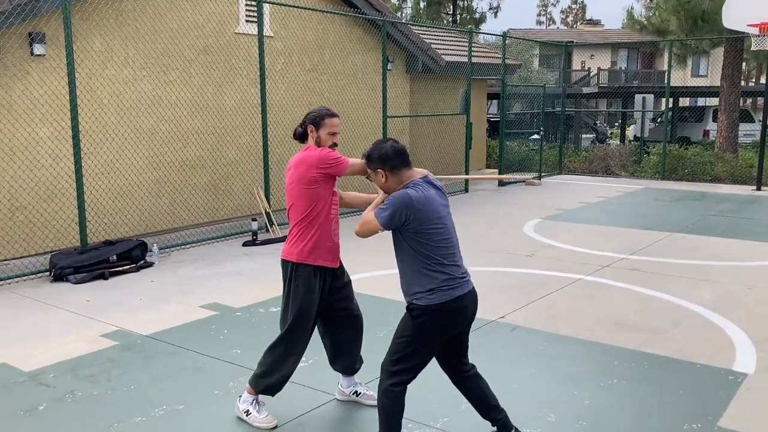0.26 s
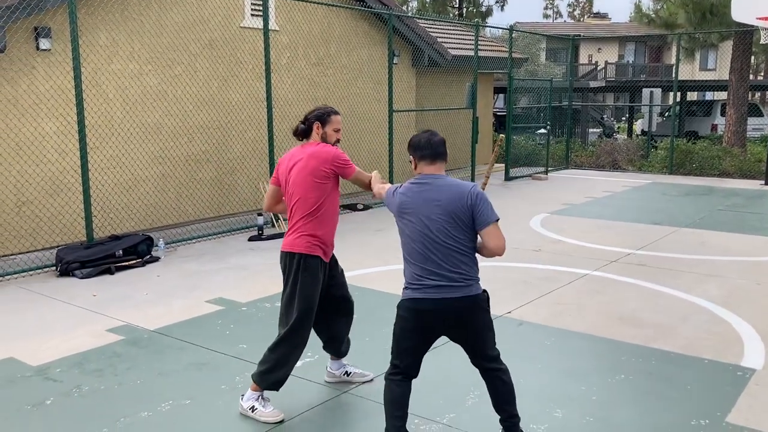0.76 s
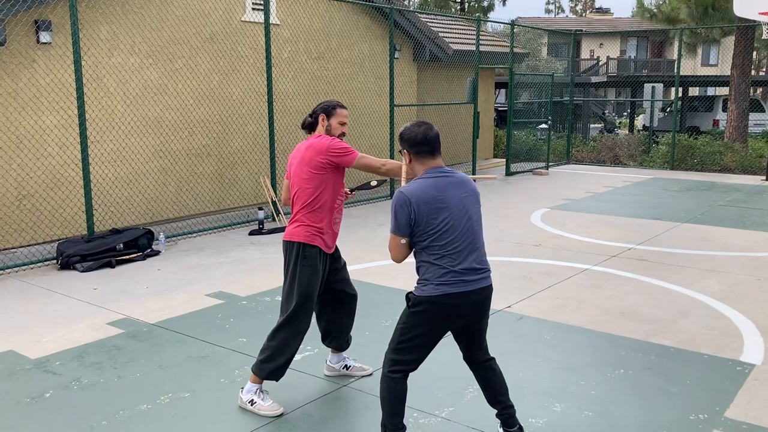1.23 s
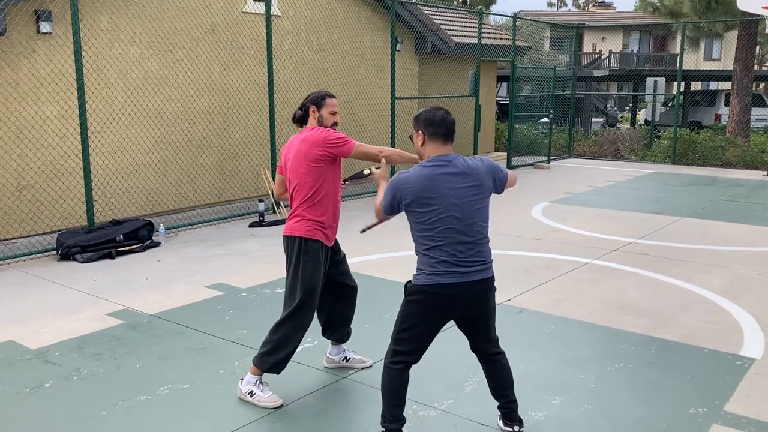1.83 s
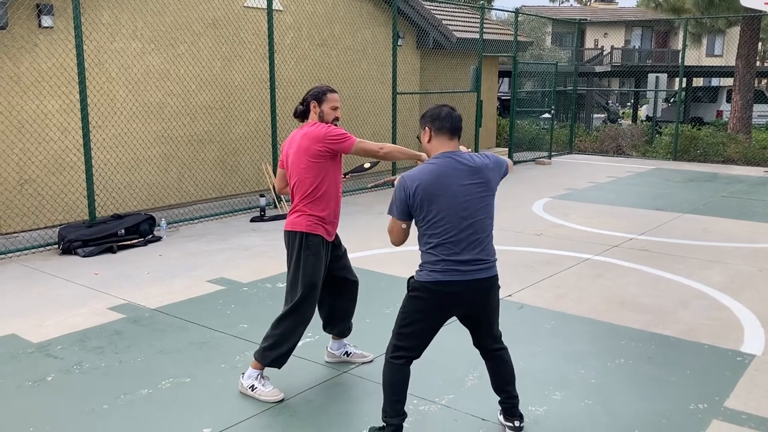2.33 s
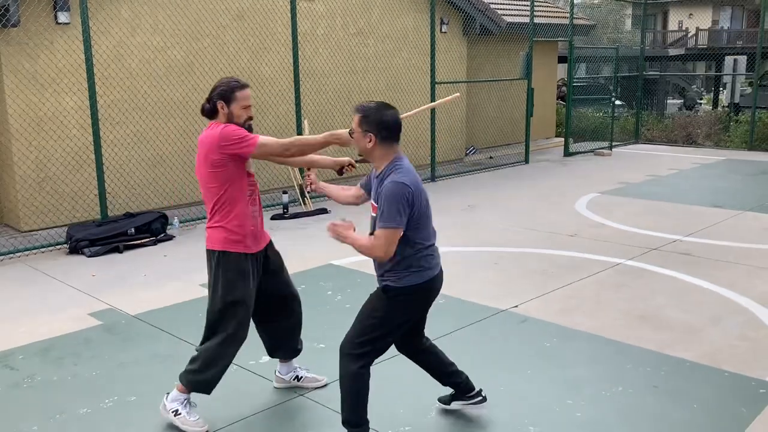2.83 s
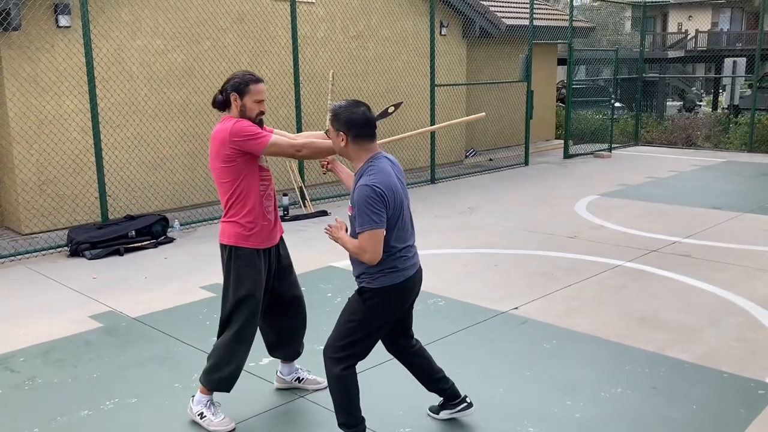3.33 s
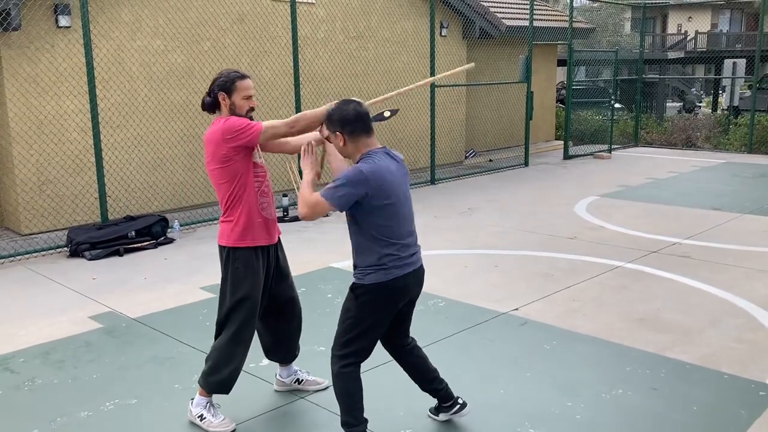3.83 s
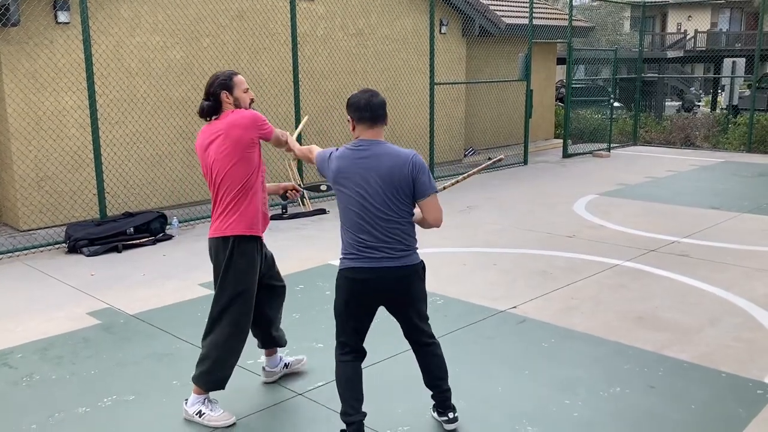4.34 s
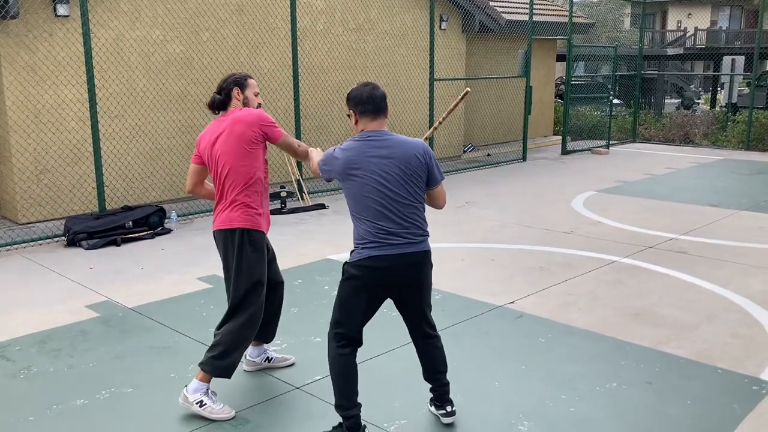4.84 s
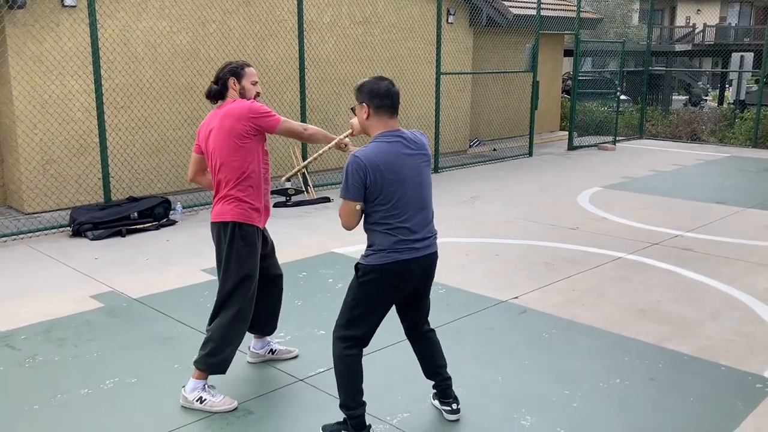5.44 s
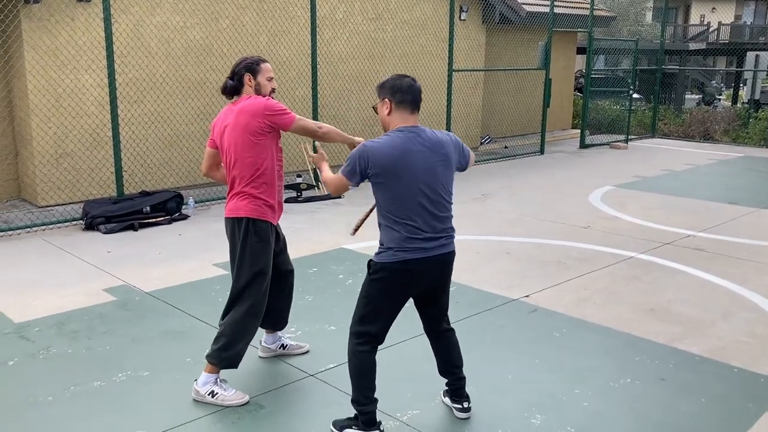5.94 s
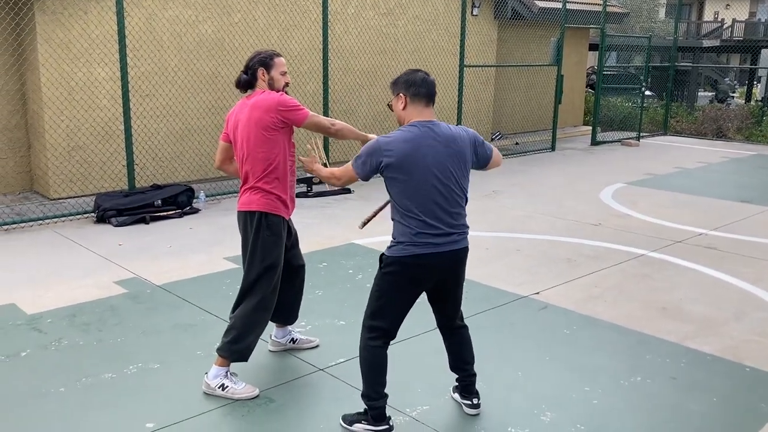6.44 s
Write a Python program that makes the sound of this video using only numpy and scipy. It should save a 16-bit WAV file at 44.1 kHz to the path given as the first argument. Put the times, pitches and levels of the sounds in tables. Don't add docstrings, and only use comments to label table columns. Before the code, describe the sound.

Outdoors on a concrete court, an old stick clack rings away over a low engine drone and distant traffic. Soles scrape grit, hands and wood tap lightly, and weight thuds down. After a brief dip the engine vanishes, a car draws away, and one loud wooden crack sounds close to the phone, echoing off a wall. Scuffs, taps and small bird whistles follow.

```python
import sys
import numpy as np
from scipy import signal
from scipy.fft import rfft, irfft, next_fast_len
from scipy.io import wavfile
from scipy.ndimage import uniform_filter1d, map_coordinates

SR = 44100
rng = np.random.default_rng(int(sys.argv[2]) if len(sys.argv) > 2 else 0)


def store_pcm(level_fs):
    pcm = np.round(np.clip(level_fs, -1, 1) * 32767).astype(np.int16)
    wavfile.write(sys.argv[1], SR, np.atleast_2d(pcm).T)


def to_linear_factor(level_db):
    exponent = np.asarray(level_db, float) / 20
    return 10 ** exponent


N = 294588
TIME = np.arange(N) / SR
CHANGE_S = 2.615


def unit(x):
    return x / np.sqrt(np.mean(x ** 2) + 1e-20)


def along(points, hz):
    f, v = np.transpose(points)
    return np.interp(np.log(hz + 1), np.log(f + 1), v)


def curves(rows):
    s, *cols = np.transpose(rows)
    return [np.interp(TIME, s, c) for c in cols]


def wobble(rate):
    return map_coordinates(rng.standard_normal(int(N * rate / SR) + 4), [np.arange(N) * rate / SR])


def filtered(x, response):
    m = next_fast_len(x.shape[-1] + 8192)
    return irfft(rfft(x, m) * response(np.fft.rfftfreq(m, 1 / SR)), m)[..., :x.shape[-1]]


def narrow(hz, width, samples):
    noise = rng.standard_normal((2, samples))
    return unit(filtered(noise, lambda f: np.exp(-2 * ((f - hz) / width) ** 2)))


# frequency in Hz, left-right likeness.
LIKENESS = [(60, 0.96), (130, 0.95), (290, 0.72), (640, 0.13), (1410, -0.04), (3100, 0.014), (6820, 0.079),
            (15000, 0.63)]


def rush(spectrum, patchy_db):
    z = signal.stft(rng.standard_normal((2, N)), nperseg=512)[2]
    field = uniform_filter1d(rng.standard_normal(z.shape[1:]), 6, 0)
    field = uniform_filter1d(field, 12, 1)
    pair = signal.istft(z * to_linear_factor(patchy_db * unit(field)), nperseg=512)[1][:, :N]

    def mid_and_side(hz):
        angle = np.arccos(np.clip(along(LIKENESS, hz), -1, 1)) / 2
        return to_linear_factor(along(spectrum, hz)) * [np.cos(angle), np.sin(angle)]

    mid, side = filtered(pair, mid_and_side)
    return unit(np.array([mid + side, mid - side]))


def blank():
    return np.zeros((2, N + SR))


def add(track, s, sound):
    track[:, round(s * SR):][:, :sound.shape[-1]] += sound


def sides(pan_db):
    return to_linear_factor([[pan_db / 2], [-pan_db / 2]])


def ring(t, hz, t60, attack, lag=0):
    return to_linear_factor(-60 * t / t60) * (1 - np.exp(-t / attack)) * np.sin(2 * np.pi * hz * t - lag)


# frequency in Hz, width in Hz, level in dB, 60 dB decay in seconds.
OLD_CLACK = [
    (1790, 480, -60, 0.98),
    (2740, 160, -57.5, 0.38),
    (3660, 180, -69.5, 0.62),
    (6800, 980, -74.5, 0.82),
]


def earlier_clack():
    n = SR // 2
    tail = 0
    for hz, width, db, t60 in OLD_CLACK:
        tail = tail + to_linear_factor(db + 2.5 * wobble(31)[:n]) * narrow(hz, width, n) * to_linear_factor(-60 * TIME[:n] / t60)
    return np.pad(tail, ((0, 0), (0, N - n)))


# time in seconds, firing rate in Hz, level in dB, beating neighbour in dB relative to it.
ENGINE_RUN = [(0, 76.6, -40, 2), (.13, 87.74, -51.5, -29), (.23, 90.2, -33, -9), (.4, 89.7, -48, -15),
              (.55, 90.5, -42, -17), (.68, 89.9, -46, -26), (.9, 89, -46.5, -14), (1, 89.35, -40, -24),
              (1.5, 88.63, -40.5, -23), (1.65, 84.97, -36, -30.5), (1.98, 74.5, -35.5, -37),
              (2.1, 71.9, -39.5, -0.5), (2.3, 69.25, -46.5, 1.5), (2.43, 71.9, -44.5, 1),
              (2.6, 77.44, -30, -11.5)]
# frequency in Hz, density in dB per Hz.
EXHAUST = [(40, -40.5), (60, 0), (75, 3), (110, -1), (140, -12.5), (250, -57)]
EXHAUST_DB = -47
BEAT_HZ, BEAT_NULL_S = 8.4, 2.212


def engine():
    hz, db, near_db = curves(ENGINE_RUN)
    phase = 2 * np.pi * np.cumsum(hz) / SR + .25 * wobble(10)
    beat = 2 * np.pi * BEAT_HZ * (TIME - BEAT_NULL_S)
    rough = to_linear_factor(1.6 * wobble(14))
    second_order = to_linear_factor(-22.5) * np.sin(2 * phase)
    neighbour = to_linear_factor(near_db) * np.sin(phase - beat)
    tone = np.sqrt(2) * rough * (np.sin(phase) + second_order - neighbour)
    exhaust = to_linear_factor(EXHAUST_DB) * rush(EXHAUST, patchy_db=3.5)
    return (to_linear_factor(db + 0.22) * tone + exhaust) * (TIME < CHANGE_S) * sides(-1.2)


# time in seconds, tyre wash in dB.
ROAD_STRENGTH = [
    (0, -64),
    (.8, -64),
    (1.6, -66.5),
    (2.2, -64),
    (2.6, -64),
    (2.7, -53),
    (3.3, -57.5),
    (4.7, -60.5),
    (5.7, -59.5),
    (6.68, -59.5),
]
# frequency in Hz, density in dB per Hz.
ROAD_RUMBLE = [(22, -41), (33, -13), (45, 0.5), (90, 2), (130, -3), (190, -6.5), (260, -18.5), (500, -49),
               (2000, -98)]
ROAD_DRONE = [(120, -40.5), (200, -1.5), (250, -1), (330, -7), (450, -11.5), (700, -29), (2000, -94)]
TYRE_WASH = [(150, -32.5), (400, -2.5), (800, 0), (1300, -7.5), (2000, -11), (3000, -22.5), (5000, -31.5),
             (9000, -41), (16000, -47.5)]
# frequency in Hz, gain in dB.
SCREEN = [(300, 3), (600, 0.5), (1500, -1.5), (2200, -2.5), (4000, -2.5), (6000, -1)]
ROAD_DB, RUMBLE_DB, DRONE_DB = -62.5, -52.5, -58
RUMBLE_FOLLOWS, DRONE_FOLLOWS = 0.49, 0.81


def traffic():
    wash_db, = curves(ROAD_STRENGTH)
    swing_db = wash_db - ROAD_DB
    rumble_db = RUMBLE_DB + RUMBLE_FOLLOWS * swing_db + 5.5 + 0.88 * wobble(4.9)
    rumble = to_linear_factor(rumble_db) * rush(ROAD_RUMBLE, patchy_db=0.8)
    drone_db = DRONE_DB + DRONE_FOLLOWS * swing_db + 1.0 + 0.83 * wobble(8.9)
    drone = to_linear_factor(drone_db) * rush(ROAD_DRONE, patchy_db=2.0)
    wash = rush(TYRE_WASH, patchy_db=1.74)
    screened = filtered(wash, lambda hz: to_linear_factor(along(SCREEN, hz)))
    wash_gain = to_linear_factor(wash_db + 2.0 + 0.37 * wobble(5.3))
    return rumble + drone + wash_gain * np.where(TIME < CHANGE_S, screened, wash)


# frequency in Hz, density in dB per Hz.
SOLE_HISS = [(1500, -31), (4000, -7.5), (6000, -2), (8000, -2.5), (11500, -0.5), (16000, -5.5)]
GRIT_NOISE = [(500, -16), (1200, -0.5), (2800, -3), (4000, -2), (5000, -9.5), (8000, -41.5)]
# start in seconds, held time in seconds, hiss in dB, grit over hiss in dB,
# fade while held in dB.
SHOE_DRAGS = [(0, 0.17, -86.5, 27.5, 8.5), (.26, 0.13, -64.5, 6, 5.5), (.55, 0.05, -72.5, 1, -11),
              (.62, 0.094, -60.5, -4, 12), (0.777, 0.068, -62.5, 2, 3.5), (1.225, 0.04, -80.5, 10, -2),
              (1.535, .04, -77.5, 10, 6), (2.635, 0.14, -61.5, 2.5, -10), (2.84, 0.061, -58, 13.5, 5),
              (2.955, 0.064, -53.5, -11, -0.5), (3.1, 0.17, -83.5, 23.5, 10),
              (3.402, 0.41, -89, 14.5, -6.5), (3.755, 0.024, -71, 8, 2.5), (3.8, 0.14, -75, 9.5, 3.5),
              (3.95, 0.11, -65, 3.5, 1.5), (4.08, 0.083, -65.5, -8, 0), (4.25, .12, -66.5, 3.5, 1),
              (4.448, 0.058, -56.5, 5.5, 1.5), (4.55, 0.026, -65.5, 8, 8), (4.6, 0.23, -81.5, 14.5, 7.5),
              (5.235, 0.083, -71, 15, 14.5), (5.565, 0.031, -68, 9, 7.5), (6.28, 0.14, -86.5, 4.5, -2)]
DRAG_RISE_DB_PER_S, DRAG_FALL_DB_PER_S = 749, 299
RUSTLE_DB, RUSTLE_GROWS_DB = -90, 7.5


def shoes():
    hiss_gain = grit_gain = to_linear_factor(RUSTLE_DB + RUSTLE_GROWS_DB * (TIME > CHANGE_S))
    for s, held, db, grit_db, fade_db in SHOE_DRAGS:
        rise = DRAG_RISE_DB_PER_S * np.maximum(s - TIME, 0)
        fade = fade_db * np.clip((TIME - s) / held, 0, 1)
        fall = DRAG_FALL_DB_PER_S * np.maximum(TIME - s - held, 0)
        drag = to_linear_factor(db - rise - fade - fall)
        hiss_gain = np.hypot(hiss_gain, drag)
        grit_gain = np.hypot(grit_gain, to_linear_factor(grit_db) * drag)
    grains = to_linear_factor(2.59 * wobble(320) + 1.5 * wobble(40))
    hiss = to_linear_factor(5.0) * hiss_gain * unit(grains * rush(SOLE_HISS, patchy_db=2.5))
    grit = to_linear_factor(-2.5) * grit_gain * unit(grains * rush(GRIT_NOISE, patchy_db=-1.0))
    return hiss + grit


# start in seconds, length in seconds, frequency in Hz, width in Hz, level in dB.
RUBS = [(0.25, 0.043, 4050, 360, -64), (0.26, .045, 3700, 500, -62.5), (0.25, .025, 4400, 500, -66),
        (0.198, 0.054, 3900, 300, -74), (.035, 0.075, 1820, 260, -61), (.1, 0.047, 1580, 150, -64),
        (2.96, 0.15, 2600, 3800, -68), (1.242, 0.16, 4400, 300, -82), (4.449, 0.052, 4200, 1000, -52),
        (4.1, 0.12, 4400, 700, -71.5), (5.492, 0.13, 4050, 496, -72), (5.602, 0.1, 4200, 600, -73),
        (6.31, 0.16, 3960, 601, -77)]


def swishes():
    out = blank()
    for s, length, hz, width, db in RUBS:
        u = np.linspace(0, 1, int(length * SR))
        add(out, s, to_linear_factor(db) * np.sin(np.pi * u ** 0.8) * narrow(hz, width, SR // 4)[:, :len(u)])
    return out[:, :N]


# start
# in seconds, peak in dB, ring in Hz, left over right in dB.
TAP_RINGS = [(0.7698, -41.5, 613, 3), (.796, -40, 880, 4), (0.802, -37.5, 1070, 1), (0.797, -46.5, 3700, 3),
             (0.8034, -41, 1880, 5), (1.2315, -56, 1790, -4.5), (1.31, -62.5, 3900, -3),
             (1.528, -57, 3892, 4), (2.214, -55.5, 2392, -0.5), (2.703, -37, 512, 2),
             (2.795, -33.5, 2390, -8.5), (2.8605, -39.5, 1180, 1), (2.95, -24, 3700, 0),
             (2.9503, -33, 783, 3), (2.9504, -36, 1670, 6), (4.4415, -30, 744, 3), (4.4416, -36, 3580, 1.5),
             (4.472, -41, 1510, -1.5), (4.4705, -27, 3830, -0.5), (4.47, -35.5, 560, 0),
             (4.479, -35, 3920, 0), (4.5, -33, 5400, -12), (4.5503, -50, 3500, 0), (5.159, -59, 1394, 1.5),
             (5.214, -51.5, 1660, -1), (5.211, -50, 3670, 0.5), (5.29, -53, 3500, -2.5),
             (5.5555, -45.5, 3960, 1), (5.586, -57, 2298, 5), (5.665, -58, 3457, -1.5),
             (.5435, -57, 430, 5), (0.7956, -41, 1450, 3), (.7968, -46, 2350, 11), (0.802, -46, 1390, 2),
             (0.7687, -52, 1300, 5), (0.7694, -56, 3905, 5), (0.827, -50, 4700, 2), (.8285, -50, 3970, 0),
             (1.0475, -54, 580, 5), (2.626, -48, 1550, -5.5), (2.753, -46.5, 986, 4.5),
             (2.664, -38.5, 4460, 0), (2.688, -44.5, 4700, 3), (2.9758, -44, 1040, .5),
             (4.44, -40, 6550, 0), (4.4555, -40, 3700, 1.5), (4.463, -41, 4470, -3.5),
             (4.472, -36, 6340, 5), (4.4765, -31, 5000, 0), (4.5012, -48, 4160, -5),
             (0.517, -55.5, 2000, -6), (.592, -50, 1200, 0), (.592, -42, 4500, 2),
               (.668, -59, 2150, -3.5), (1.2311, -65, 2280, 3), (1.2317, -54.5, 3270, 8),
               (1.3, -47, 6500, -1), (1.309, -60, 6200, 2.5), (1.34, -67, 6200, 1), (1.529, -63, 2270, 2),
               (2.9, -62, 1630, -1), (2.215, -66.5, 4600, 0), (3.579, -49, 1630, -0.5),
               (3.577, -59, 2900, -0.5), (3.827, -52, 3000, 0.5), (5.2105, -51, 3200, 2),
               (5.212, -52, 6720, -0.5), (5.554, -57, 2060, 2), (5.554, -49, 7590, -1.5),
               (5.615, -58, 4700, 0), (2.703, -49, 1300, 0), (4.4405, -50, 1700, 7),
               (4.4408, -54, 2400, -4), (4.4704, -52.5, 2500, 3.5), (4.475, -45, 1300, 0),
               (2.6545, -33, 9200, 2.5), (.5917, -42, 10650, 0), (.592, -47, 530, 2),
               (.7965, -38.5, 560, 7), (.779, -51, 1200, 2), (2.657, -43.5, 460, -0.5),
               (2.8225, -37, 520, 0), (2.826, -40.5, 850, 1), (4.4985, -41, 580, 4), (4.447, -44, 670, 1),
               (4.4885, -49, 1700, 0), (4.578, -49, 4700, 0), (2.8645, -42, 750, 0), (5.242, -58, 4300, 0),
               (2.9502, -34, 2880, 1), (2.9498, -35, 4400, 0), (2.951, -37.5, 1170, 3),
               (.625, -55, 4400, 0), (.6245, -55, 3800, 0), (.624, -58, 2350, 0), (5.214, -46, 4000, 1),
               (5.552, -52, 2980, 0), (4.4755, -44, 1800, 0), (4.4985, -50, 1730, 0)]
GRIP_S, TAP_CYCLES = 0.0043, 7.4


def taps():
    out, t = blank(), np.arange(SR // 10) / SR
    for s, db, hz, pan_db in TAP_RINGS:
        lag = np.array([[-1], [1]]) * hz / 4500
        t60 = GRIP_S + TAP_CYCLES / hz
        sound = ring(t, hz, t60, 0.00038, lag)
        sound = sound + 0.19 * ring(t, 0.67 * hz, t60, 0.00046, lag)
        sound = sound + 0.17 * ring(t, 1.1 * hz, 0.29 * t60, 0.000068, lag)
        add(out, s, to_linear_factor(db + 6.5) * sound * sides(pan_db))
    return out[:, :N]


# start in seconds, peak in dB, dull part in dB, length in seconds,
# left over right in dB.
FLAT_SLAPS = [(0.624, -59, 6, 0.0037, 2), (0.8, -60, 8, 0.0089, -4), (1.262, -66, 0, 0.0044, 0),
              (0.592, -38.5, -7.5, 0.0085, 1), (0.768, -54, -9, 0.0025, 3), (0.825, -55.5, 2, 0.004, -2),
              (1.232, -51, 0.5, 0.006, 0.5), (1.528, -52.5, -5, 0.0064, 2), (2.217, -51.5, -7.5, 0.0045, 0),
              (2.6545, -22, -14.5, 0.0022, 2), (2.658, -24.5, -11.5, 0.0079, -2),
              (2.8581, -36, -6, 0.0056, -0.5), (2.95, -40, 3, 0.0027, 1), (3.579, -70, 9.5, 0.0031, -3.5),
              (3.824, -66.5, 10, 0.0043, 0.5), (4.245, -64, -6, .004, 0), (2.847, -48, -6, .003, 1),
              (4.4405, -37, -14.5, .003, -1.5), (4.463, -37, -17, 0.0026, -8),
              (4.4702, -35.5, -1, 0.0047, 4.5), (5.212, -44.5, -3, 0.0076, 0),
              (5.553, -43, -5.5, 0.0086, 1), (5.58, -57.5, -2, 0.016, 0), (6.235, -59, -10, 0.0034, -0.5)]


def slaps():
    out, t = blank(), np.arange(SR // 20) / SR
    for s, db, dull_db, length, pan_db in FLAT_SLAPS:
        noise = rng.standard_normal((2, 3, len(t)))
        shared = noise[:, :1]
        air = 1.4 * noise[:, 1:] + shared - .9 * signal.hilbert(shared).imag * [[1], [-1]]
        knots = t[::60]
        spurts = to_linear_factor(2.4 * np.interp(t, knots, rng.standard_normal(len(knots))))
        shape = spurts * np.exp(-(t / length) ** 3) + 1.8 * np.exp(-t / 0.00054) + 0.049 * np.exp(-t / .015)
        lumps_db = rng.normal(0, 1.0, size=24)
        cup = lambda hz: to_linear_factor(np.interp(hz, np.linspace(0, 16000, len(lumps_db)), lumps_db))
        bright = unit(filtered(air[0], lambda hz: cup(hz) * to_linear_factor(along(SOLE_HISS, hz)) * (hz / 9000) ** 0.28))
        dull = unit(filtered(air[1], lambda hz: cup(hz) * to_linear_factor(along(GRIT_NOISE, hz))))
        add(out, s, to_linear_factor(db - 7.0) * shape * (bright + to_linear_factor(dull_db) * dull) * sides(pan_db))
    return out[:, :N]


# start in seconds, peak in dB, frequency in Hz, 60 dB decay in seconds.
HEAVY_THUDS = [(.811, -20, 223, 0.063), (.823, -17, 98, 0.093), (0.8368, -24, 175, 0.065),
               (2.7036, -25, 300, 0.027), (2.756, -28, 290, 0.042), (2.815, -23.5, 255, 0.064),
               (4.472, -31, 300, .06), (4.45, -35, 270, .05), (0.846, -27.5, 58.7, 0.31),
               (.862, -19.5, 90, 0.047), (2.79, -10.5, 280, 0.033), (2.806, -24, 101.5, 0.2),
               (2.83, -22.5, 61, 0.2), (2.9519, -29, 330, 0.03), (4.495, -21.5, 91, 0.056),
               (4.508, -29.5, 46, 0.44), (4.89, -26.5, 64.5, 0.2)]


def thuds():
    out, t = blank(), np.arange(SR // 2) / SR
    for s, db, hz, t60 in HEAVY_THUDS:
        add(out, s, to_linear_factor(db - 4.0) * ring(t, hz, t60, 0.29 / hz)[None])
    return out[:, :N]


# start in seconds, length in seconds, first pitch in Hz, last pitch in Hz, level in dB.
WHISTLES = [(1.076, 0.059, 4300, 4310, -73), (1.14, 0.085, 4300, 4350, -86), (1.698, .07, 4220, 4210, -85),
            (1.527, 0.022, 10000, 9700, -79), (1.645, 0.02, 10030, 9900, -76),
            (1.634, 0.054, 4180, 4250, -79.5), (1.761, 0.018, 10040, 9820, -76),
            (1.788, 0.032, 4080, 3675, -79), (1.845, 0.03, 4030, 3408, -78), (1.89, 0.022, 9950, 9800, -75),
            (1.995, 0.023, 9800, 9800, -82), (2.108, .018, 9800, 9700, -79),
            (2.421, 0.076, 4170, 4180, -80), (3.469, 0.053, 4410, 4400, -61),
            (4.82, 0.057, 4300, 4390, -74.5), (4.965, 0.015, 3500, 3250, -73),
            (5.003, 0.011, 3400, 3250, -76), (5.017, 0.013, 3470, 3300, -75.5),
            (6.07, 0.052, 4330, 4400, -73), (3.55, 0.016, 4390, 4400, -70)]
CLEAR_DB, BLURS_DB = -66, 9


def birds():
    out = blank()
    for s, length, from_hz, to_hz, db in WHISTLES:
        u = np.linspace(0, 1, int(length * SR))
        phase = 2 * np.pi * np.cumsum(from_hz + (to_hz - from_hz) * u) / SR
        phase = phase + .4 * np.sin(75 * 2 * np.pi * u * length)
        phase = phase + np.clip((CLEAR_DB - db) / BLURS_DB, 0, 3) * wobble(120)[:len(u)]
        swell = np.sin(np.pi * u) ** 0.61
        flutter = to_linear_factor(2.5 * np.sin(38 * 2 * np.pi * u * length + rng.uniform(0, 6)))
        add(out, s, to_linear_factor(db + 1.0) * swell * flutter * np.sin(phase + np.array([[0], [1.3]])))
    return out[:, :N]


# delay in ms, frequency in Hz,
# width in ms, left level in dB, right level in dB.
CRACK_PATHS = [(0, 2800, .2, 1, -30), (.5, 3570, .65, -19, -11), (1.91, 2450, .5, -19, -7),
               (1.4, 1670, 1.1, -16, -19), (-.25, 7000, .2, -21, -24), (-.25, 11500, .15, -19, -21),
               (1.4, 4200, 1, -23, -17.5), (3.4, 3300, .6, -32, -29), (1.5, 7000, .6, -38, -35),
               (.3, 5700, .4, -28, -30), (1.5, 4850, .8, -33, -33), (-.2, 15200, .3, -26, -28),
               (3.6, 2500, .9, -29, -22)]
# frequency in Hz, level in dB, 60 dB decay in seconds.
STICK_MODES = [(399.7, -18.5, 0.063), (621, -23.5, 0.0556), (787, -15, 0.031), (1150, -22.5, 0.03),
               (1660, -30, 0.03), (2080, -25.5, 0.027), (2500, -25.5, 0.02), (2933, -40, .02),
               (3600, -32.5, 0.013), (4170, -30.5, 0.012)]
CLACK_S = 2.7876


def clack():
    out, t = blank(), np.arange(SR // 10) / SR
    ms = 1000 * t - 2
    for delay, hz, width, left_db, right_db in CRACK_PATHS:
        swell = np.exp(-.5 * ((ms - delay) / width) ** 2)
        pulse = swell * np.sin(2 * np.pi * hz * (ms - delay) / 1000 - [[0], [1.4]])
        add(out, CLACK_S - .002, pulse * to_linear_factor([[left_db], [right_db]]))
    for hz, db, t60 in STICK_MODES:
        lag = np.array([[-1], [1]]) * hz / 4000
        add(out, CLACK_S, to_linear_factor(db) * ring(t, hz, t60, 1.5 / hz, lag) * sides(2.4))
    return out[:, :N]


# frequency in Hz, 60 dB decay in seconds.
YARD_DECAY = [(200, 0.39), (1000, 0.49), (4000, 0.56), (10000, .15)]
# delay in seconds, level in dB.
WALL_ECHOES = [
    (.0088, -30),
    (.0275, -22),
    (0.031, -17),
    (.0355, -27),
    (.047, -30),
    (.072, -30),
]
GATHERS_S = .042


def court(x):
    hz, t, z = signal.stft(rng.standard_normal((2, SR)), SR, nperseg=256)
    tail = signal.istft(z * to_linear_factor(-60 * t / along(YARD_DECAY, hz)[:, None]), SR, nperseg=256)[1]
    n = tail.shape[1]
    gather = 1 - np.exp(-(np.arange(n) / SR / GATHERS_S) ** 2)
    tail = tail * to_linear_factor(2.5 * wobble(220)[:n]) * gather
    answer = to_linear_factor(-25.5) * np.pad(tail / np.linalg.norm(tail[0]), ((0, 0), (150, 0)))
    for delay, db in WALL_ECHOES:
        smear = rng.standard_normal((2, 60)) * np.exp(-np.arange(60) / 5)
        add(answer, delay, to_linear_factor(db) * smear / np.linalg.norm(smear, axis=1)[:, None])
    far = filtered(x, lambda hz: 1 / (1 + 1j * hz / 9000))
    return signal.fftconvolve(far, answer, axes=1)[:, :N]


# frequency in Hz, gain in dB.
PORT_RESPONSE = [(20, 2), (4700, 0), (5500, -3), (7000, 0.5), (8000, 0), (8600, -7), (9400, -14.5),
                 (10000, -2.5), (12600, -3), (13400, -17.5), (14100, -16.5), (14700, -1), (15700, -5),
                 (16500, -45)]


def ports(x):
    return filtered(x, lambda hz: to_linear_factor(along(PORT_RESPONSE, hz)))


def squelch(x, under_db, quiet_db):
    hz, _, z = signal.stft(x, SR, nperseg=1024)
    power = np.mean(np.abs(z[:, :512]) ** 2, 0)
    power = power.reshape(64, 8, -1).mean(1)
    power = uniform_filter1d(power, size=3, axis=1)
    faint = power < to_linear_factor(2 * under_db) * np.median(power[15:38], 0)
    top = power[38:]
    faint[38:] |= top < to_linear_factor(2 * quiet_db + 5 * rng.standard_normal(top.shape))
    keep = np.repeat(~faint, 8, 0) | (hz[:512, None] < 4500)
    return signal.istft(z * np.pad(keep, ((0, 1), (0, 0))), SR, nperseg=1024)[1][:, :N]


def scene():
    crack = clack()
    blows = taps() + slaps()
    song = birds()
    after = TIME - CLACK_S
    duck = to_linear_factor(-6.5 * np.exp(-np.abs(after) / 0.063) * (after > .004))
    echoes = court(crack + 1.41 * blows + 1.2 * song)
    steady = echoes + song + shoes() + swishes() + traffic() + engine() + earlier_clack()
    close = ports(crack + blows + thuds())
    return close + squelch(ports(duck * steady), under_db=-4.5, quiet_db=-108)


def low_pass(x):
    return signal.sosfilt(signal.butter(12, 17020, fs=SR, output="sos"), x)


def record(dry):
    past = TIME - CHANGE_S
    dip = np.clip(np.maximum(-past / 0.038, past / 0.023), .02, 1)
    return low_pass(dry * dip)


dry = scene()
out = record(dry)
store_pcm(out)
```